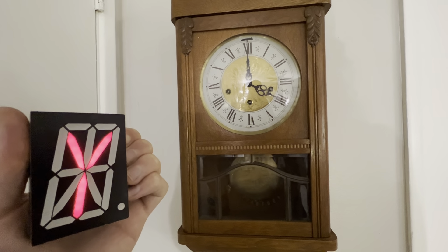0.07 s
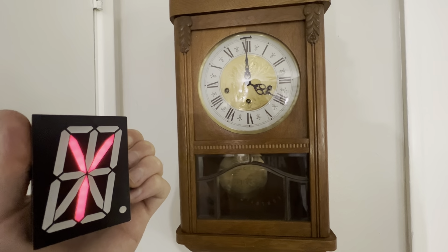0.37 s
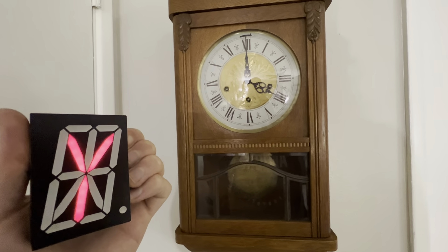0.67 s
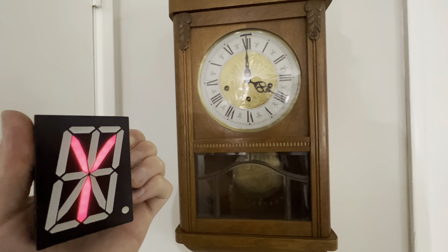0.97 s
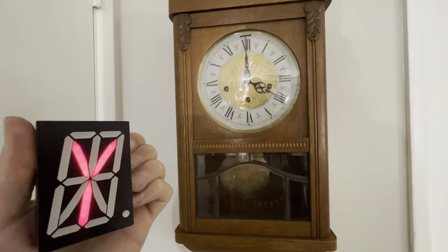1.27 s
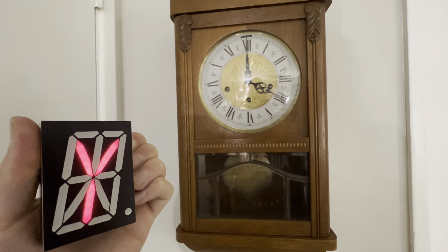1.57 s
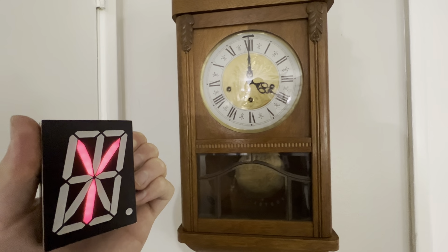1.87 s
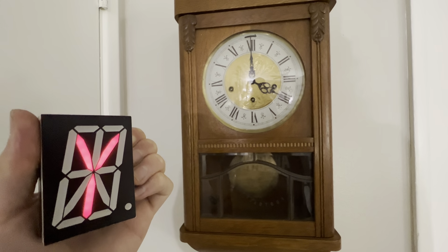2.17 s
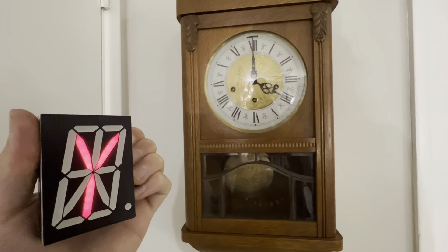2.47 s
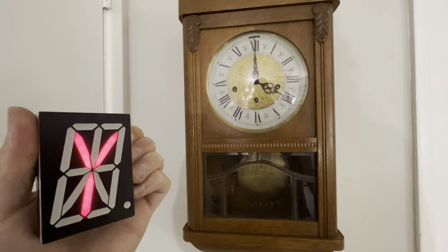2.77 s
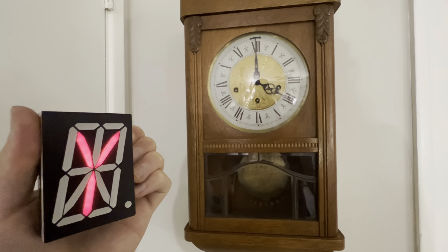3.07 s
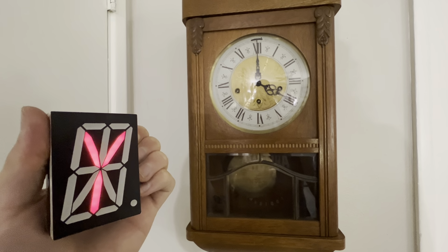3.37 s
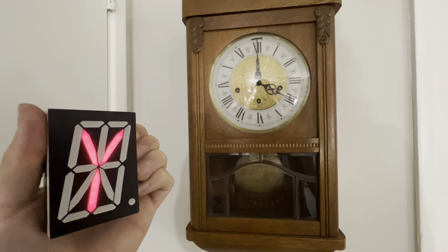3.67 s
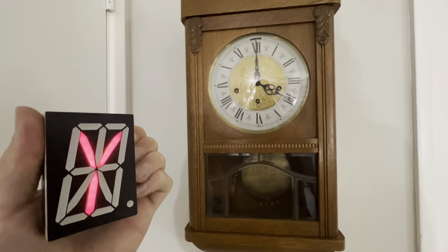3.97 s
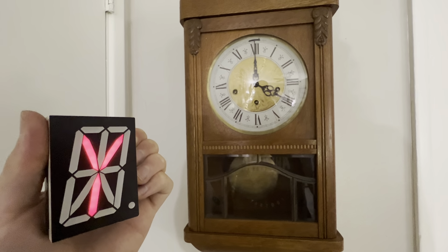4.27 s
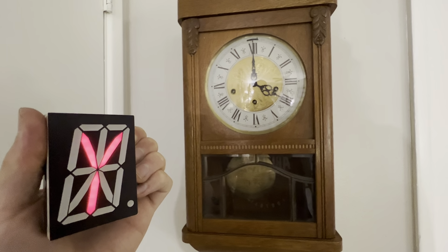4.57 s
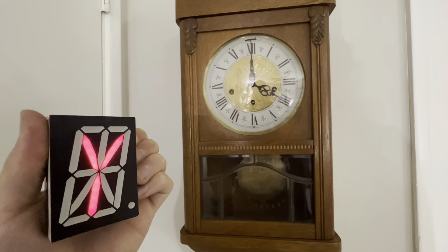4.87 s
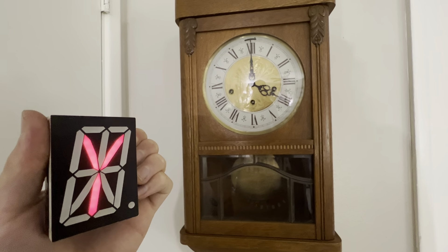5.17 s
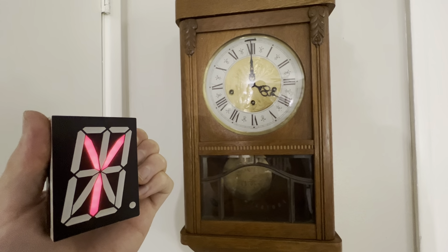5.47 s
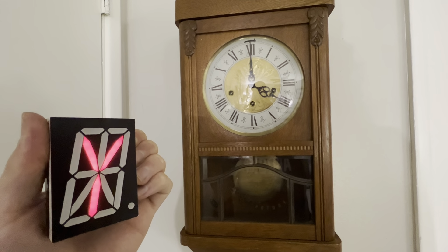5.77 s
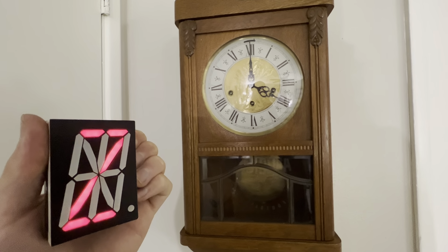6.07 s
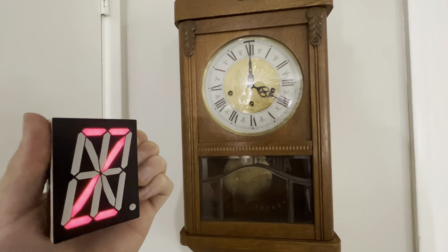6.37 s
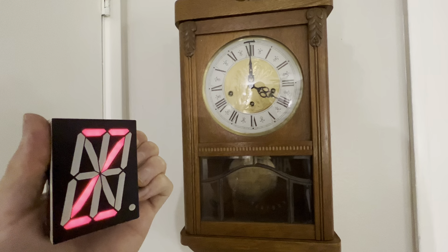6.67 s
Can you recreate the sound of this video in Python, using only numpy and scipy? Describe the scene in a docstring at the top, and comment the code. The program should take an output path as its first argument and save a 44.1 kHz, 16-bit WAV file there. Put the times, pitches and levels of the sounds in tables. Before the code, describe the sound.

Muffled traffic and a low hum lie under the slightly lopsided tick-tock of a mechanical wall clock in a quiet room. Its brass gears shiver lightly inside a wooden case, with another very faint tick behind and occasional soft clothing rustles. Late on, something hard knocks once in the room, then a handheld plastic object clicks twice near the microphone as the traffic swells and the clock keeps going.

```python
"""From the start a pendulum wall clock ticks, slightly out of beat, in a quiet room with traffic outside.
In each beat a gear tooth slides off one catch (a pallet), the next tooth lands on the other, and the
gears shiver in the wooden case. A fainter tick comes once a second. From about 1.5 s a sleeve rustles
now and then. Near 6 s something knocks in the room, then a plastic object in the hand clicks twice
while the traffic grows louder."""
import sys
import numpy as np
from scipy import signal
from scipy.fft import rfft, irfft, next_fast_len
from scipy.io import wavfile

SR = 44100
rng = np.random.default_rng(int(sys.argv[2]) if len(sys.argv) > 2 else 0)


def transcribe(u):
    """Save the signal u as a 16-bit wav file named by the first command-line argument.

    u: samples, shape (n,) or (channels, n), limited to [-1, 1]; the rate is SR.
    q: integer samples, one column per channel.
    """
    v = np.clip(np.atleast_2d(u).T, -1, 1)
    q = np.round(v * 32767).astype(np.int16)
    wavfile.write(sys.argv[1], SR, q)


N = 305172
T = np.arange(N) / SR
SIZE = next_fast_len(N, True)
HZ = np.maximum(np.arange(SIZE // 2 + 1) * SR / SIZE, 1)
SWING_S = 1.0149  # the pendulum's trip there and back
BLOW_SPREAD_DB = .8  # no two teeth land equally hard

# how alike the background is in both ears: (frequency [Hz], likeness [0 to 1])
EAR_LIKENESS = [(50, 1), (100, 0.95), (250, 0.5), (500, 0.48), (1000, 0.25), (2000, 0.12), (5000, 0.079),
                (12000, 0.17)]


def clock():
    """The pendulum rocks a piece called the anchor, whose two catches stop the teeth in turn: tock, tick."""
    # each catch: (first landing [s], snap [dB], ring [dB], slide lead [s], shiver delay [s], shiver [dB])
    tock_catch = (0.1765, -62, -59.8, .089, .016, -65.5)
    tick_catch = (0.7214, -59.7, -55.2, .069, .020, -61.5)
    # how hard the teeth rub before they slip off: (time [s], level [dB])
    tock_rubbing = [(1.2, -72), (2.2, -86), (5.2, -84), (6.3, -76)]
    tick_rubbing = [(.7, -67), (1.75, -68), (2.75, -64), (3.75, -72), (4.8, -78), (5.8, -70.5)]
    tocks, tock_rings, tock_slides, tock_shivers = beat_parts(tock_catch, tock_rubbing)
    ticks, tick_rings, tick_slides, tick_shivers = beat_parts(tick_catch, tick_rubbing)
    teeth = gear_teeth(tocks, ticks, tock_slides + tick_slides, tock_shivers + tick_shivers)
    landings = tock_rings + tick_rings
    return teeth + anchor(landings) + wooden_case(landings)


def beat_parts(catch, rubbing):
    """One catch stops a tooth once a swing. Lists its snaps, rings, slides and shivers by time and level."""
    # how hard the gears push: (time [s], level [dB])
    gear_push = [(0, -.4), (1.7, 0), (2.8, .4), (3.6, -2.4), (4.8, -1), (6.92, -2.8)]
    first, snap_db, ring_db, lead, delay, shiver_db = catch
    times = np.arange(first, N / SR, SWING_S)
    push_db = np.interp(times, *np.transpose(gear_push)) + BLOW_SPREAD_DB * rng.standard_normal(len(times))
    snaps = zip(times, snap_db + push_db)
    rings = zip(times, ring_db + .6 * push_db)
    slides = zip(np.maximum(times - lead, 0), np.interp(times, *np.transpose(rubbing)))
    shivers = zip(times + delay, shiver_db + 1.15 * push_db)
    return list(snaps), list(rings), list(slides), list(shivers)


def gear_teeth(tock_rows, tick_rows, slide_rows, shiver_rows):
    """Teeth slide and land, and the gears shiver; each sounds through the brass works in its own way."""
    # notes at which the brass works ring: (pitch [Hz], width [Hz], level [dB])
    brass = [(2340, 56, 12), (2730, 11, 3), (2915, 49, 4), (3200, 28, -5.5), (4560, 70, 3), (5250, 31, 9),
             (6630, 42, 9), (7340, 100, -1), (8570, 59, 9), (8890, 89, 15), (9580, 70, 10), (11400, 170, 8),
             (15300, 110, 18.5)]
    # tone colour of each kind of contact: (frequency [Hz], level [dB])
    tock_tone = [(200, -4), (500, 31), (1200, 20), (1800, 18), (2300, 9), (3500, 9.5), (5000, -0.5),
                 (6200, -3), (8500, -1.5), (10500, -21), (12500, -17), (16000, -36)]
    tick_tone = [(200, 2), (500, 20), (1000, 24), (1600, 8), (2100, 11), (3200, -1.5), (5000, 2),
                 (6200, -6), (8500, -8), (10500, -16), (12500, -20), (16000, -32)]
    shiver_tone = [(300, -9), (900, 9.5), (2000, 10), (3200, 3.5), (4600, 1.5), (6000, -6), (7300, 1.5),
                   (9200, -3.5), (10500, -20), (12500, -24), (16000, -36)]
    slide_tone = [(500, -7), (2000, 3), (3500, -5.5), (4600, -3.5), (6000, -8), (7300, -1), (9200, -6.5),
                  (10500, -19), (12500, -26), (16000, -26)]
    tocks = contacts(tock_rows, body(tock_tone, brass), rise_s=.0005, t60=.044, room_db=-2, room_t60=.27)
    ticks = contacts(tick_rows, body(tick_tone, brass), rise_s=.00033, t60=.086, room_db=-4, room_t60=.43)
    shivers = contacts(shiver_rows, body(shiver_tone, brass),
                       rise_s=.0024, t60=.18, room_db=-22, room_t60=.49)
    slides = contacts(slide_rows, body(slide_tone, brass), rise_s=.0072, t60=.04, room_db=1, room_t60=.2)
    snaps = from_db(9.5) * tocks * pan(2.8) + from_db(3) * ticks * pan(1.2)
    return snaps + (from_db(2.5) * shivers + from_db(-.6) * slides) * pan(-2.5)


def anchor(landings):
    """The anchor rings at each landing; its echoes smear the ring into a short clack."""
    # notes of the anchor and its plate: (pitch [Hz], level [dB], ring time [s])
    notes = [(1890, -14, 0.086), (2244, 2, 0.052), (2283, 3.7, 0.088), (2520, -14, .16), (2790, -27, 0.078),
             (5380, -22.5, 0.045)]
    direct = sum(from_db(db) * ring(s, notes, rise_s=.0016, detune=.003, phase_spread=.25)
                 for s, db in landings)
    echo_tone = resonances([(2220, 410, .5), (2900, 220, -6.5)]) ** 2
    echoes = contacts(landings, echo_tone, rise_s=.0041, t60=.069, room_db=-9.5, room_t60=.22)
    return direct * pan(.3) + from_db(-3) * echoes


def wooden_case(landings):
    """The wooden case takes up each blow slowly and booms on."""
    # low notes of the case: (pitch [Hz], level [dB], ring time [s])
    notes = [(230.2, -3, 0.72), (240.2, -4.5, 0.44), (361, -5, .3), (457, -5.5, 0.31), (505, 0.5, 0.3)]
    booms = sum(from_db(db) * ring(s, notes, rise_s=.02, detune=.015, phase_spread=1.18)
                for s, db in landings)
    return from_db(4.5) * booms * pan(5)


def knock():
    """A light, hard knock across the room: a short crack, then its duller ring."""
    # two blows, heard as one: (time [s], level [dB])
    blows = [(5.858, -52), (5.8632, -42)]
    # tone colour of the knock: (frequency [Hz], level [dB])
    tone = [(150, 3), (700, 2), (1700, 0.5), (3000, -5), (4500, -6), (6000, -13), (8700, -13), (11000, -26),
            (16000, -42)]
    # notes of the knocked thing: (pitch [Hz], width [Hz], level [dB])
    notes = [(722.4, 21, 15.5), (870, 100, 7), (1280, 25, 14), (1710, 40, 5), (2220, 28, 8), (3555, 37, 11),
             (3600, 49, 0), (3870, 42, 0), (4800, 35, -4), (6550, 200, -3)]
    bright = body(tone, notes)
    dull = bright / (1 + (HZ / 5500) ** 4)
    crack = contacts(blows, bright, rise_s=.00067, t60=.044, room_db=-9, room_t60=.24)
    tail = contacts(blows, dull, rise_s=.0052, t60=.21, room_db=-9, room_t60=.43)
    return (from_db(2) * crack + from_db(-4.5) * tail) * pan(1.5)


def hand_clicks():
    """Plastic snaps in the hand, close and to the left, so the room hardly answers."""
    # the two clicks: (time [s], level [dB], delay at the right ear [s])
    clicks = [(6.076, -50, .00042), (6.4099, -47, .00085)]
    # notes of the plastic: (pitch [Hz], level [dB], ring time [s])
    notes = [(2050, 4.5, 0.0075), (2610, -3.5, 0.0083), (4540, -13, 0.0072), (5980, -11, 0.0075),
             (8000, -9, 0.0041)]
    # tone colour of the echo from the walls: (frequency [Hz], level [dB])
    echo_tone = [(500, -14), (2300, 0), (4000, -10), (6400, -8), (9000, -16), (11000, -32), (16000, -50)]
    snaps = np.zeros((2, N))
    for s, db, lag in clicks:
        ears = [ring(s + late, notes, rise_s=.00063, detune=.042, phase_spread=.26, uneven_db=0)
                for late in (0, lag)]
        snaps += from_db(db + 17) * np.array(ears)
    band = signal.butter(2, [1300, 9000], "band", fs=SR, output="sos")  # too small to give off bass
    echo = contacts([row[:2] for row in clicks], from_db(at_hz(echo_tone)),
                    rise_s=.001, t60=.085, room_db=-7, room_t60=.29)
    return signal.sosfilt(band, snaps) * pan(4.6) + from_db(-10.5) * echo


def faint_ticks():
    """A faint tick, probably another small clock, steps once a second."""
    # the steps: (time [s], level [dB])
    steps = [(0.3204, -66.5), (1.3418, -78.5), (2.3414, -81), (3.349, -70.5), (4.3212, -68.5),
             (5.3505, -74)]
    # notes of the ticking thing: (pitch [Hz], width [Hz], level [dB])
    notes = [(3680, 220, -3), (3900, 220, 0)]
    ticks = contacts(steps, resonances(notes) ** 2, rise_s=.00079, t60=.045, room_db=-8, room_t60=.35)
    return from_db(1.5) * ticks * pan(1.5)


def rustle():
    """The sleeve rubs as the hand shifts, and the fingers add a brighter brush."""
    # the strokes: (time [s], level [dB], length [s])
    sleeve_strokes = [(1.53, -70.3, 0.1), (2.38, -74, .14), (3.17, -67, .1), (3.28, -71, 0.12),
                      (3.53, -71, .13), (4.6, -71.3, .3), (5.44, -74, .13), (6.31, -71.5, .14)]
    finger_strokes = [(3.16, -80.5, 0.1), (5.43, -80.5, 0.087), (6.275, -70.5, 0.11)]
    # their tone colours: (frequency [Hz], level [dB])
    sleeve_tone = [(300, -0.5), (1000, 6.5), (1800, 3.5), (3000, .5), (4200, -12.5), (6500, -19.5),
                   (9000, -20.5), (11000, -40), (16000, -62)]
    finger_tone = [(1500, -4), (4000, -7), (6000, 2), (8500, 3), (10000, -11.5), (12500, -15), (16000, -38)]
    sleeve = friction(sleeve_strokes, sleeve_tone, grain_db=1.5)
    fingers = friction(finger_strokes, finger_tone, grain_db=3)
    return from_db(.5) * sleeve + from_db(-4.5) * fingers


def traffic_rumble(traffic_db):
    """Traffic comes through the walls as a deep rumble."""
    # tone colour of the rumble: (frequency [Hz], level [dB])
    tone = [(18, -60), (30, -38), (38, -19), (47, -11), (58, -3), (74, 7), (88, -1.5), (120, -4.5),
            (150, -13), (220, -21.5), (400, -57), (1000, -100)]
    rumble = through(stereo_noise(at_hz(EAR_LIKENESS)), body(tone, [(232.2, 19, 16)]))
    return from_db(traffic_db + 2.5) * rumble * pan(.7)


def far_engines():
    """Each far engine fades in, holds while its pitch glides, and fades out."""
    # the engines: (start [s], end [s], first pitch [Hz], last pitch [Hz], level [dB])
    engines = [(-.15, .64, 119, 127, -55.5), (.95, 1.32, 132, 135, -59), (2.1, 2.65, 111, 104, -59),
               (2.8, 4.95, 107, 108, -56), (3.95, 4.46, 67, 68, -44.5), (4.6, 5.1, 62, 60, -50),
               (4.68, 5.1, 102, 96, -52), (5.1, 6.6, 113, 117, -51.3), (5.85, 7.1, 169, 163, -56),
               (6.1, 7.1, 83, 80, -49.5)]
    out, fade_s = np.zeros(N), .13
    for start, end, start_hz, end_hz, db in engines:
        swell = np.clip(np.minimum(T - start, end - T) / fade_s, 0, 1)
        pitch = np.interp(T, [start, end], [start_hz, end_hz])
        out += from_db(db) * swell * drone(pitch, waver=.24, width_hz=6)
    return out * pan(2.2)


def room_air(traffic_db):
    """The room's soft rush rises and falls a little with the traffic."""
    # tone colour of the rush: (frequency [Hz], level [dB])
    tone = [(100, 3), (190, -8), (400, 0.5), (650, -5.5), (1000, -10.5), (1500, -13.5), (2100, -23.5),
            (2800, -33.5), (4200, -38.5), (7200, -37), (9000, -44.5), (12000, -56), (13500, -71),
            (16000, -80)]
    # notes of the room that stand out of it: (pitch [Hz], width [Hz], level [dB])
    notes = [(235, 10.7, 3.5), (294.7, 15, -0.5), (360.3, 23.8, 4.5), (464, 26, -8.5), (607, 27, -6.5),
             (903, 52, 3.5), (1031, 21, -2), (1341, 37, 4)]
    rush = through(stereo_noise(at_hz(EAR_LIKENESS)), body(tone, notes))
    return from_db(-54.3 + .1 * (traffic_db - traffic_db.mean())) * rush * pan(3.4)


def building_hum():
    """The building hums deeply at steady pitches."""
    # the hums: (pitch [Hz], level [dB])
    hums = [(38.5, -72), (59, -56.5)]
    return sum(from_db(db) * drone(np.full(N, hz), waver=.22, width_hz=4) for hz, db in hums) * pan(.7)


def background():
    """Traffic outside, under the rush and hum of the room."""
    # strength of the rumble, as a vehicle comes nearer at the end: (time [s], level [dB])
    traffic = [(0, -59.5), (.7, -57.5), (1.1, -62.5), (2.5, -60.5), (3.4, -63.5), (4.6, -55.5),
               (5.4, -55.5), (6.4, -50.2), (6.92, -51.5)]
    traffic_db = np.interp(T, *np.transpose(traffic))
    return traffic_rumble(traffic_db) + room_air(traffic_db) + building_hum() + far_engines()


def from_db(db):
    """Turn decibels into a number to multiply by."""
    return 10 ** (np.asarray(db) / 20)


def pan(left_db):
    """Left and right gains that make the left ear louder by left_db."""
    return from_db(np.array([[left_db], [-left_db]]) / 2)


def at_hz(points):
    """Join (frequency, value) points into a curve, giving each octave equal room."""
    hz, value = np.transpose(points)
    return np.interp(np.log(HZ), np.log(hz), value)


def resonances(notes):
    """A filter curve with a peak for each (pitch [Hz], width [Hz], level [dB])."""
    return sum(from_db(db) / (1 + 1j * (HZ ** 2 - hz ** 2) / (HZ * width)) for hz, width, db in notes)


def body(tone, notes):
    """A broad tone colour with ringing notes standing out of it."""
    return from_db(at_hz(tone)) * (1 + resonances(notes))


def through(x, curve):
    """Filter by a curve, scaled so that white noise keeps its power."""
    return irfft(rfft(x, SIZE) * curve / np.sqrt(np.mean(np.abs(curve) ** 2)), SIZE)[..., :N]


def stereo_noise(alike):
    """White noise in two ears, from unrelated (0) to the same (1)."""
    mid, side = rfft(rng.standard_normal((2, SIZE)))
    return irfft(np.sqrt((1 + alike) / 2) * mid + np.sqrt((1 - alike) / 2) * side * [[1], [-1]], SIZE)[:, :N]


def fade(age, rise_s, t60):
    """Build up quickly, then die away by 60 dB every t60 seconds (the ring time)."""
    return (1 - np.exp(-age / rise_s)) * from_db(-60 * age / t60)


def contacts(rows, curve, rise_s, t60, room_db, room_t60):
    """Each (time [s], level [dB]) is a burst of dense echoes in an object, then the room's tail."""
    age, power = T[:SR // 2], np.zeros(N + SR)
    shape = fade(age, rise_s, t60) ** 2 + (from_db(room_db) * fade(age, .0027, room_t60)) ** 2
    for s, db in rows:
        start = int(s * SR)
        power[start:start + len(age)] += from_db(db) ** 2 * shape
    return through(np.sqrt(power[:N]) * stereo_noise(.099), curve)


def ring(s, notes, rise_s, detune, phase_spread, uneven_db=BLOW_SPREAD_DB):
    """A blow at s seconds sets the notes ringing, never twice quite alike."""
    age, out, start = T[:SR // 2], np.zeros(N + SR), int(s * SR)
    for k, (hz, db, t60) in enumerate(notes):
        pitch, strength, phase = rng.standard_normal(3)
        wave = np.sin(2 * np.pi * hz * (1 + detune * pitch) * age + phase_spread * phase)
        gain = (-1) ** k * from_db(db + uneven_db * strength)
        out[start:start + len(age)] += gain * fade(age, rise_s, t60) * wave
    return out[:N]


def friction(rows, tone, grain_db):
    """Soft strokes of grainy noise that swell and fade."""
    strokes = sum(from_db(db) * np.exp(-(2 * (T - s) / length) ** 2) for s, db, length in rows)
    grain = from_db(grain_db * through(rng.standard_normal(N), 1 / (1 + (HZ / 60) ** 2)))
    return strokes * grain * through(stereo_noise(.23), from_db(at_hz(tone)))


def drone(hz, waver, width_hz):
    """A low tone whose strength wavers at random, scaled to an average power of 1."""
    slow = through(rng.standard_normal(N), np.exp(-(HZ / width_hz) ** 2))
    wave = (1 + waver * slow) * np.sin(2 * np.pi * np.cumsum(hz) / SR)
    return wave / np.sqrt(np.mean(wave ** 2))


def scene():
    """The clock, the small sounds around it and the room."""
    return clock() + faint_ticks() + knock() + hand_clicks() + rustle() + background()


def record(dry):
    """The microphone drops the deepest bass, and the highest treble is cut steeply."""
    low_hz, high_hz = 30, 15700
    thinned = signal.sosfilt(signal.butter(6, low_hz, "high", fs=SR, output="sos"), dry)
    return signal.sosfilt(signal.ellip(10, .1, 80, high_hz, fs=SR, output="sos"), thinned)


dry = scene()
out = record(dry)
transcribe(out)
```